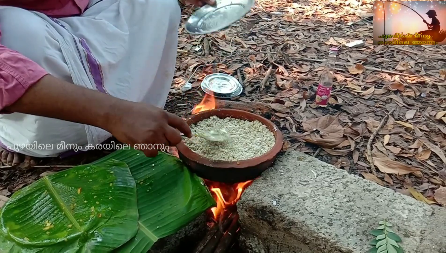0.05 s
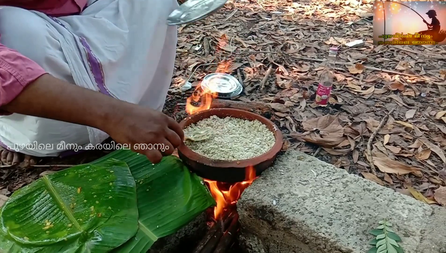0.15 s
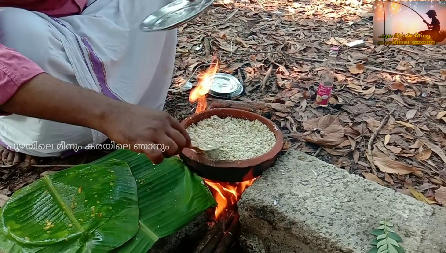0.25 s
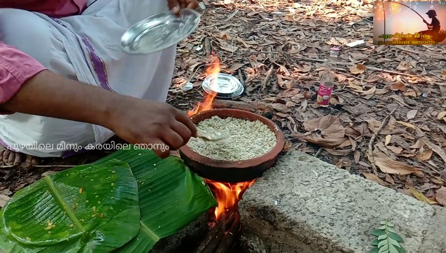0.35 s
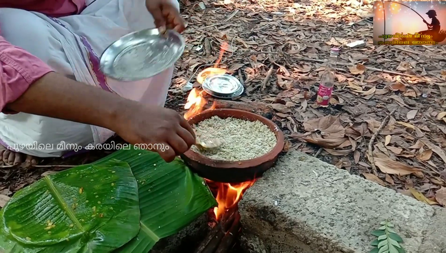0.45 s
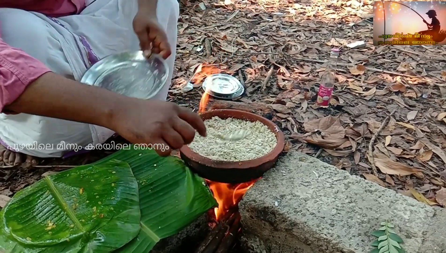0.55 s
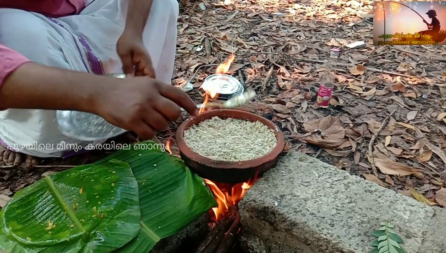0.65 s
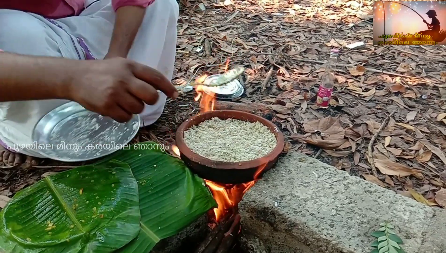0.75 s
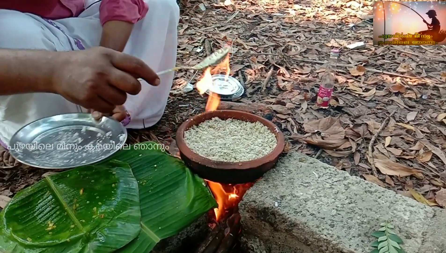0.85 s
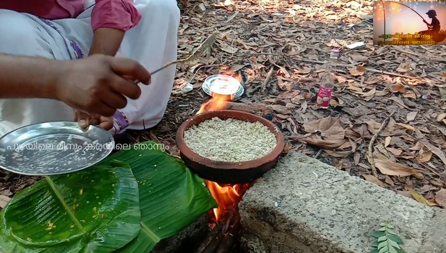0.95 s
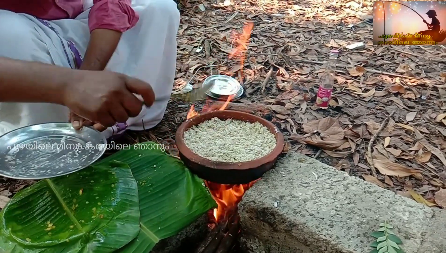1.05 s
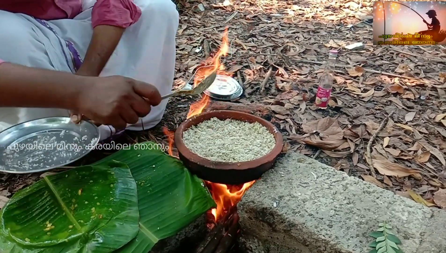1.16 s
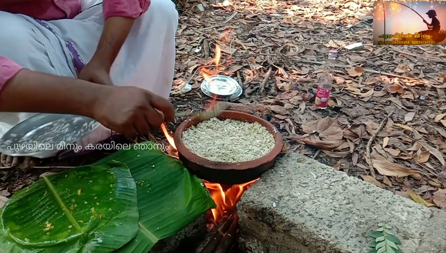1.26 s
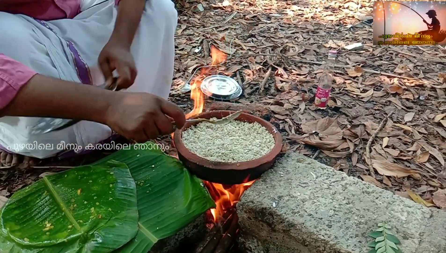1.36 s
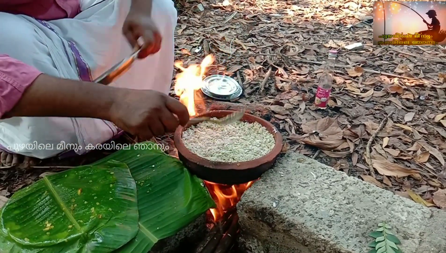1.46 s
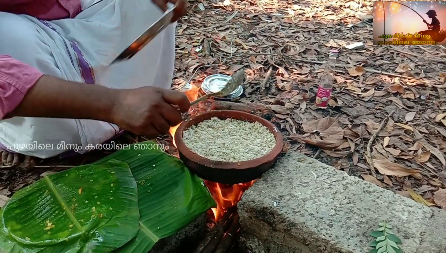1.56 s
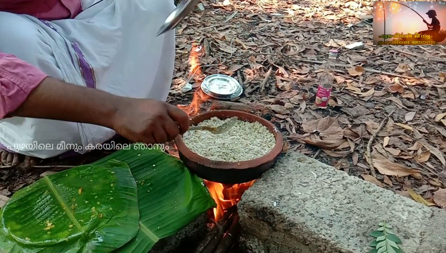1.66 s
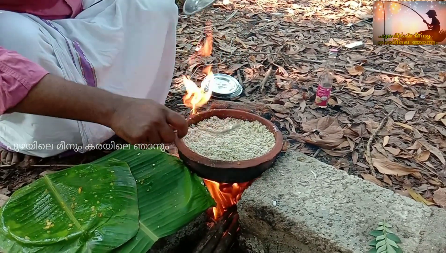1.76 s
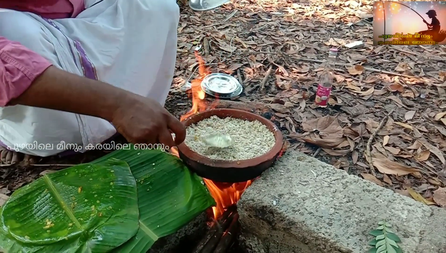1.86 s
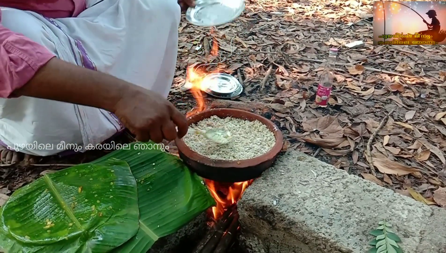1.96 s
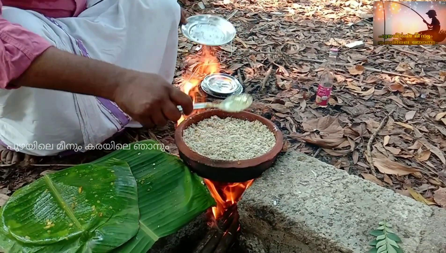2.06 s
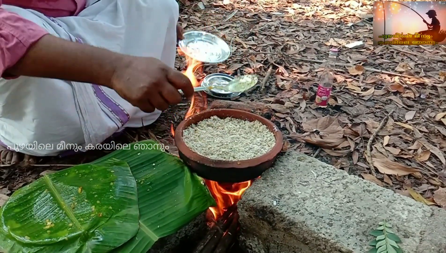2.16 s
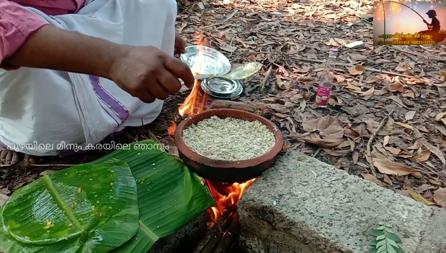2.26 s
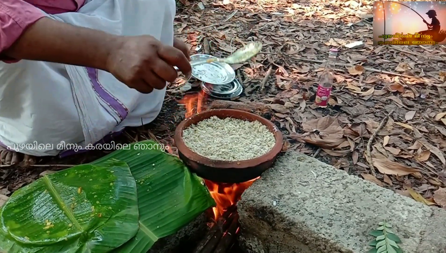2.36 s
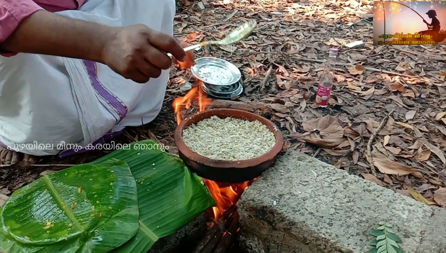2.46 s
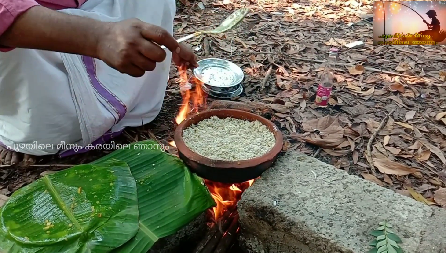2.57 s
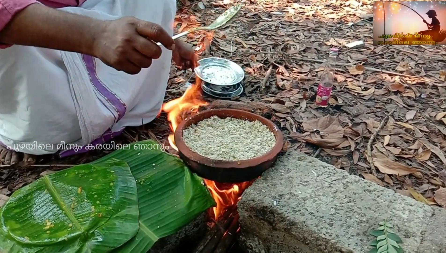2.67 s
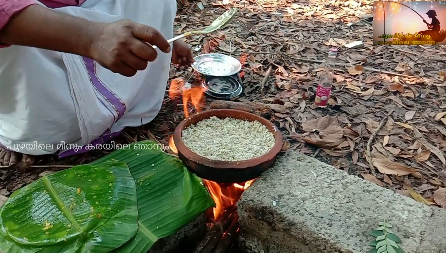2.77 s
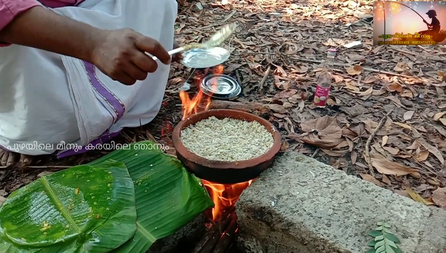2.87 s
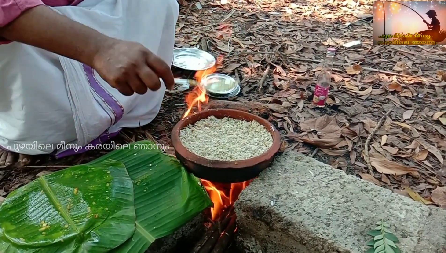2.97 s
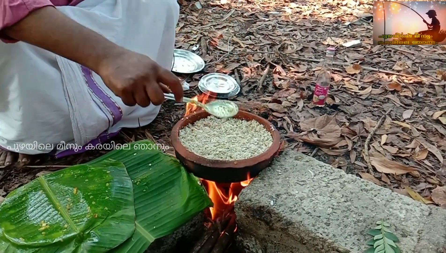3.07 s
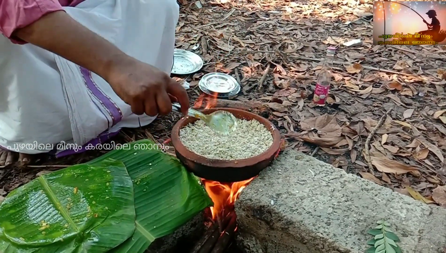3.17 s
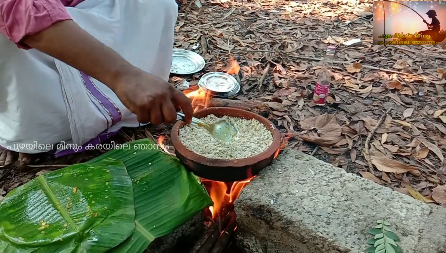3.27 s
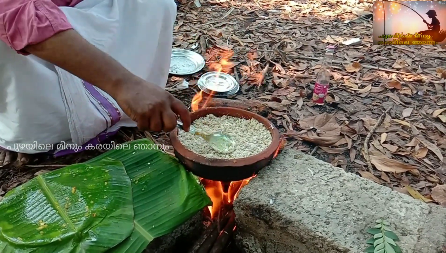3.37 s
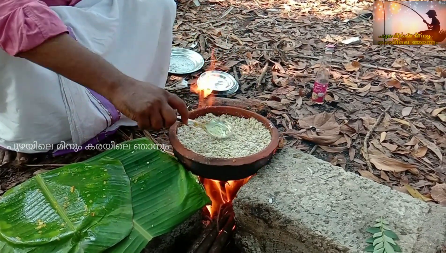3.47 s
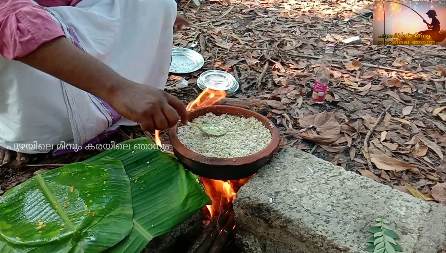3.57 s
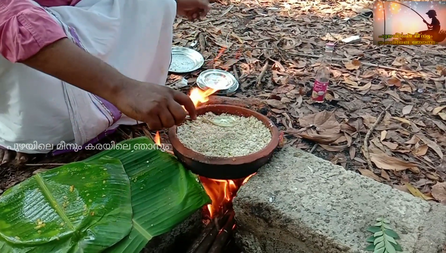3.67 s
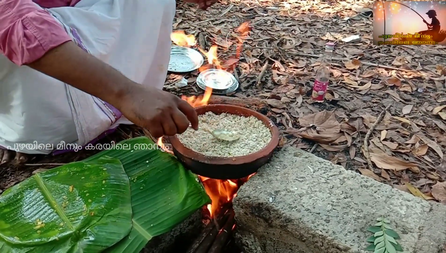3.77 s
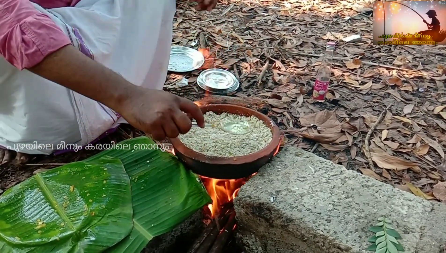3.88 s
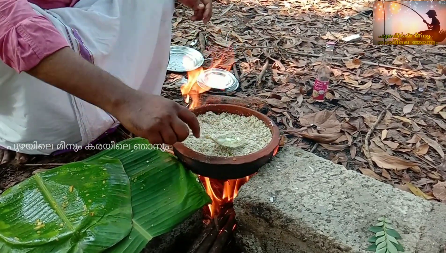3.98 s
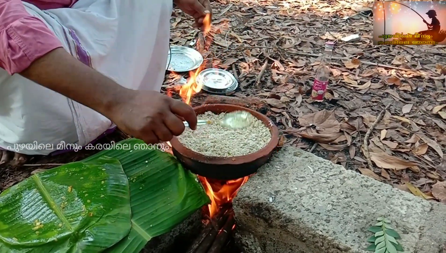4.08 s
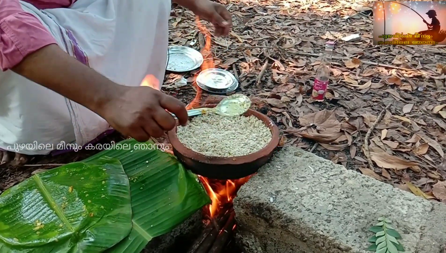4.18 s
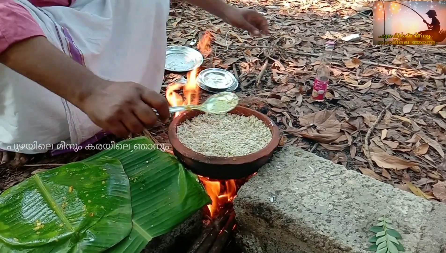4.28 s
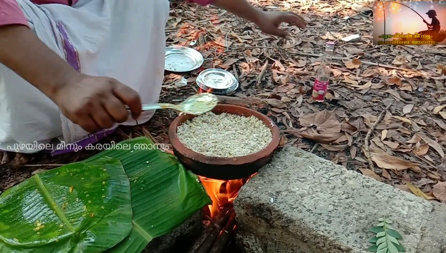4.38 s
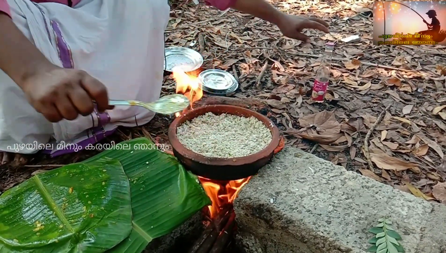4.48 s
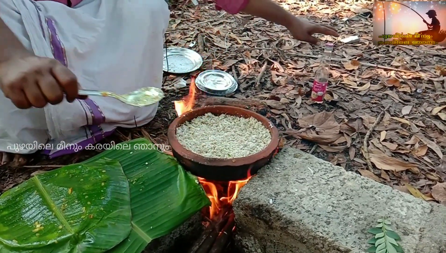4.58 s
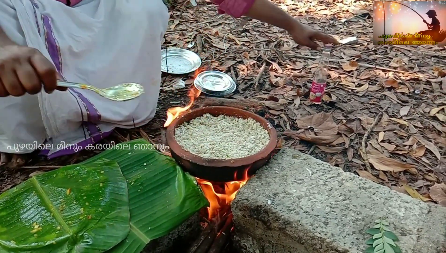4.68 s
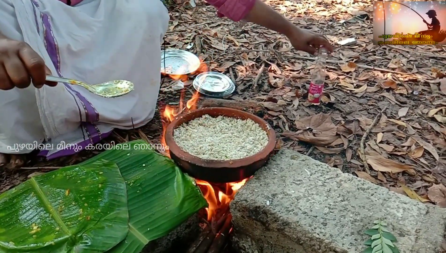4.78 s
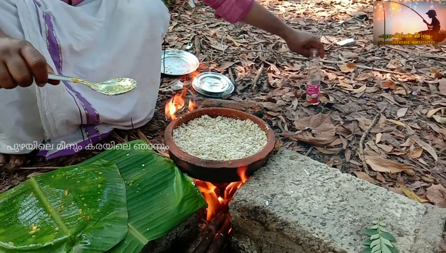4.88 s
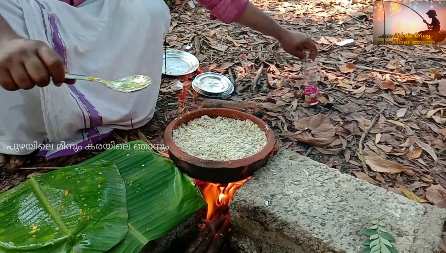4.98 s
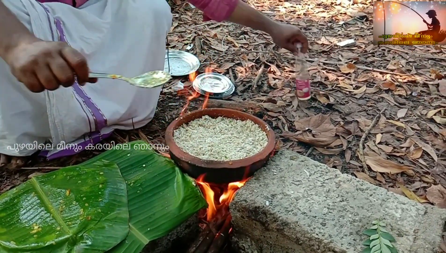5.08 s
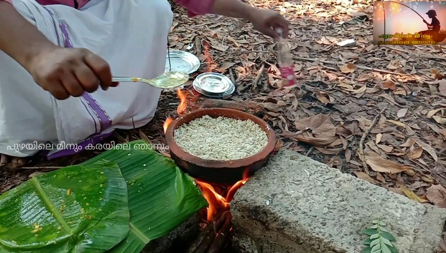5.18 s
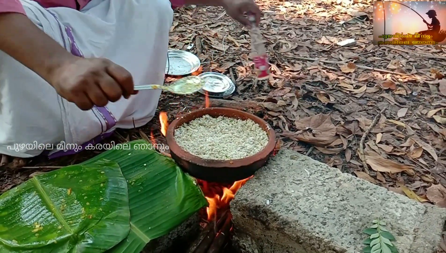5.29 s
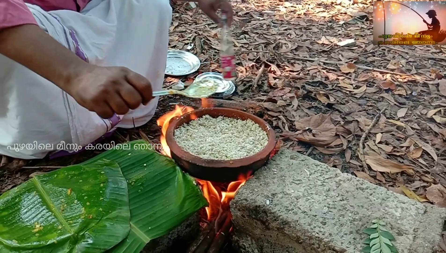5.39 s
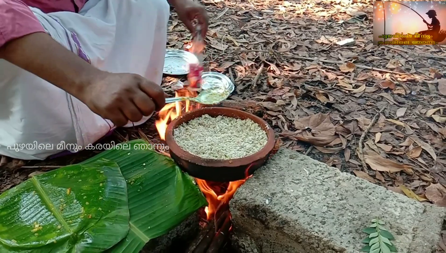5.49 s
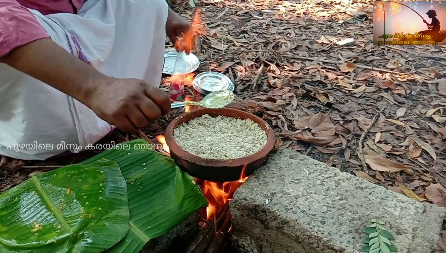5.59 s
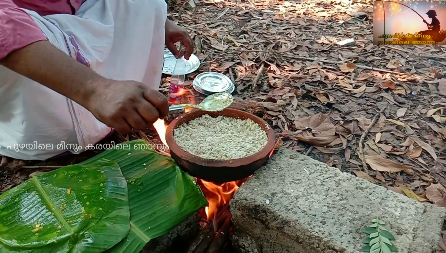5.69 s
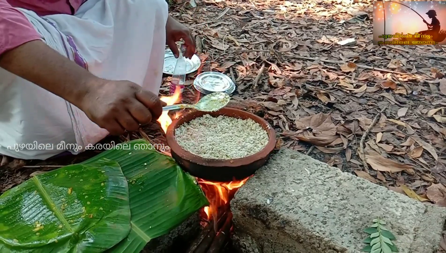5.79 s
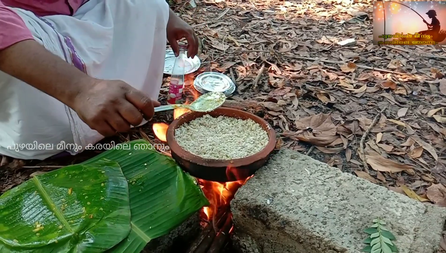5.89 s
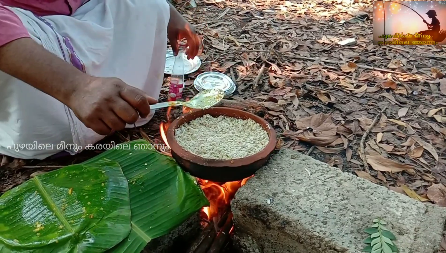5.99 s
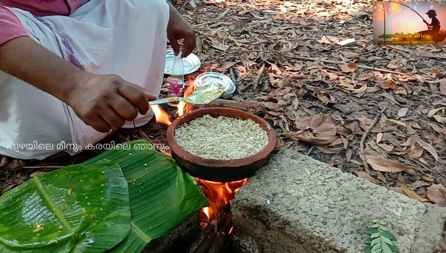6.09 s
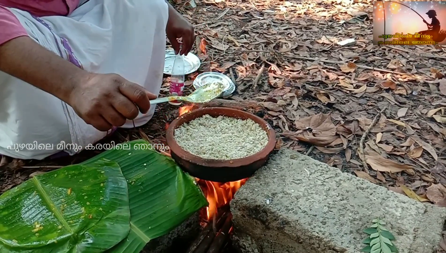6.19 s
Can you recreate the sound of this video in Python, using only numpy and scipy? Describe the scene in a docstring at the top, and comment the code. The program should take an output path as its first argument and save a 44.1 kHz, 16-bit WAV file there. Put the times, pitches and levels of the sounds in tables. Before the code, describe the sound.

Close to a phone microphone outdoors, a steel spoon quickly rattles on a clay pot rim. About two seconds later a thin metal lid clatters onto plates, bouncing and scraping briefly. A small wood fire flutters low, crackles and snaps throughout under a flickering hiss. Birds chirp, rasp and whistle sharply, with hoarse calls and a nasal mew echoing in the trees.

```python
"""A steel spoon rattles on the rim of a clay pot, then a small steel lid drops on other plates: outdoor cooking.
Each contact rings damped modes and adds a noise crack and thud; the lid scrapes, utensils knock, grains rustle.
The wood fire is fluttering low noise, snaps and fine crackle; behind it hisses filtered, flickering noise.
Birds whistle, chirp, click, mew and squeak as gliding tones, clicks and harmonic voices in echoing trees.
A phone stands close by; its microphone port rings near 1.3 and 5.5 kHz."""
import sys
import numpy as np
from scipy import signal
from scipy.fft import rfft, irfft
from scipy.io import wavfile
from scipy.ndimage import uniform_filter1d

SR = 44100
rng = np.random.default_rng(int(sys.argv[2]) if len(sys.argv) > 2 else 0)


def unload_audio(sound):
    """Save the sound as a 16-bit wav file, at the path given as the first command line argument."""
    columns = np.transpose(np.atleast_2d(sound))
    # keep every value between -1 and 1, then stretch to whole-number steps
    steps = np.round(np.clip(columns, -1, 1) * 32767)
    wavfile.write(sys.argv[1], SR, steps.astype(np.int16))


N = 275556
TIME = np.arange(N) / SR


def undb(db):
    """Amplitude factor of a level in dB."""
    return 10 ** (np.asarray(db) / 20)


def unit(x):
    """Scale to rms 1."""
    return x / np.sqrt(np.mean(x ** 2))


def peak(x, db, size=88):
    """Set the level of the loudest 2 ms."""
    loudest_power = uniform_filter1d(x ** 2, size).max()
    return x * undb(db) / np.sqrt(loudest_power)


def add(out, start_s, x):
    """Mix x in from start_s."""
    i = max(int(start_s * SR), 0)
    out[i:i + len(x)] += x[:N - i]


def walk(points_per_s, size=N):
    """Random wander with spread near 1, in straight lines between random points."""
    steps = np.arange(size) * points_per_s / SR
    count = int(steps[-1]) + 2
    return 1.213 * np.interp(steps, np.arange(count), rng.standard_normal(count))


def swells(rows):
    """Gain of smooth swells, each with its own rise and fall."""
    gain = np.zeros(N)
    for peak_s, rise_s, fall_s, db in rows:
        width_s = np.where(TIME < peak_s, rise_s, fall_s)
        gain += undb(db) * np.exp(-((TIME - peak_s) / width_s) ** 2)
    return gain


def track(rows):
    """Start time and sample-by-sample columns of a curve."""
    s, *columns = np.transpose(rows)
    t = np.arange(s[0], s[-1], 1 / SR)
    return s[0], *(np.interp(t, s, c) for c in columns)


def colour(x, points, size=4096):
    """Minimum-phase filter with the given (Hz, dB) response, via the folded cepstrum."""
    hz, db = np.transpose(points)
    log_bins = np.log(np.fft.rfftfreq(size, 1 / SR) + 1)
    gain = undb(np.interp(log_bins, np.log(hz), db))
    cepstrum = irfft(np.log(gain))
    cepstrum[1:size // 2] *= 2
    cepstrum[size // 2 + 1:] = 0
    impulse = irfft(np.exp(rfft(cepstrum)))
    return signal.fftconvolve(x, impulse)[:len(x)]


def resonance(x, hz, width_hz):
    """Two-pole band-pass."""
    return signal.lfilter(*signal.iirpeak(hz, hz / width_hz, fs=SR), x)


# Microphone port resonances. Each row: frequency in Hz, width in Hz, level in dB.
PORT = [(1275, 33.5, 17), (5305, 266, 6.5), (5580, 110, 8.5)]


def port(x):
    """Broadband sound rings the microphone port."""
    return x + sum(undb(db) * resonance(x, hz, width_hz) for hz, width_hz, db in PORT)


def decay(t, t60_s):
    """Exponential decay by 60 dB in t60_s."""
    return np.exp(-np.log(1000) * t / t60_s)


def burst(t60_s, size=8192):
    """Noise that dies away after a contact."""
    return rng.standard_normal(size) * decay(np.arange(size) / SR, t60_s)


def tone(hz):
    """Sine of rms 1 on a moving pitch."""
    return np.sqrt(2) * np.sin(2 * np.pi * np.cumsum(hz) / SR)


def crackle(per_s, spread_db):
    """Tiny random pops, a few of them larger; rms 1."""
    sizes = undb(spread_db * np.minimum(rng.exponential(size=N), 3))
    pops = (rng.random(N) < per_s / SR) * sizes * rng.choice([-1, 1], N)
    return unit(signal.fftconvolve(pops, burst(.003))[:N])


def trees(x, t60_s, buildup_s=0.0045):
    """Diffuse echo from trunks and leaves: decaying noise of unit energy."""
    tail = burst(t60_s, size=SR) * (1 - np.exp(-TIME[:SR] / buildup_s))
    return signal.fftconvolve(x, tail / np.sqrt(np.sum(tail ** 2)))[:N]


# Thin steel radiates little bass. Each row: frequency in Hz, gain in dB.
STEEL_BASS = [(100, -20), (500, -17.5), (800, -3), (1500, 0)]


def clatter(hits, clink, modes, thud, clink_t60_s, thud_t60_s, crack_db, ring_db,
            ring_tilt_db, ring_stretch, size=16384):
    """Each contact rings the steel, choked at once and then singing on faintly; it also cracks and thuds."""
    steel, body = np.zeros((2, N))
    t = TIME[:size]
    hz, db, t60_s = np.transpose(modes)[:, :, None]
    partials = undb(db) * decay(t, t60_s * ring_stretch) * np.sin(2 * np.pi * hz * t)
    # tilt in dB per octave away from the loudest mode: the free ring spreads wider than the clink
    octaves = abs(np.log2(hz[:, 0] / hz[np.argmax(db), 0]))
    tilt = undb(ring_tilt_db * octaves)
    choke = decay(t, clink_t60_s) * (1 - np.exp(-t / 0.0002))
    for s, clink_db, thud_db in hits:
        shares = undb(3 * rng.standard_normal(len(modes)))  # every contact meets the modes differently
        signs = rng.choice([-1, 1], len(modes))
        add(steel, s, peak(shares @ partials * choke, clink_db))
        add(steel, s, peak(signs * shares * tilt @ partials, clink_db + ring_db))
        add(steel, s, peak(colour(burst(clink_t60_s), clink), clink_db + crack_db))
        add(body, s, peak(colour(burst(thud_t60_s), thud), thud_db))
    return colour(steel, STEEL_BASS) + body


# Spoon on the pot rim. Each row: start in seconds, clink level in dB before the bass cut, pot thud in dB.
SPOON_HITS = [(.1715, -24.5, -41), (.1752, -19, -46.5), (.1843, -17.5, -40), (.1862, -14.5, -37),
              (.1901, -14.5, -48), (.2055, -34.5, -46), (.2085, -27.5, -39)]
# Crack spectrum. Each row: frequency in Hz, gain in dB.
SPOON_CLINK = [(880, -36), (1500, -47), (1720, -17), (2040, -46), (2400, -10.5), (3000, -13), (3500, -23),
               (4630, -29), (5350, -12), (5950, -15), (6490, -26), (7010, -23), (9180, -32.5), (10800, -26),
               (15000, -52)]
# Spoon modes. Each row: frequency in Hz, level in dB, t60 in seconds before ring_stretch.
SPOON_MODES = [(1680, -32, .12), (2295, -22, .17), (2455, -22, .12), (2803, -15, .17), (2910, -8, .12),
               (3028, -13, .1), (3086, -11, .12), (3388, -20, .15), (3830, -24, .3), (5210, -4, .09),
               (5412, 0, .06), (5818, -2, .1), (5940, -8, .11), (6970, -25, .11), (7505, -26, .14),
               (8120, -30, .09), (9955, -29, .2), (10470, -28, .15), (10775, -25, .18), (10850, -28, .15)]
# Pot thud spectrum. Each row: frequency in Hz, gain in dB.
POT_THUD = [(30, -29), (120, -46), (220, -6), (285, 3), (400, -8.5), (520, -13.5), (700, -18), (845, -3.5),
            (980, -34), (1250, -6), (2000, -30), (4000, -31)]


def spoon():
    """Steel spoon rattles on the rim; the clay pot thuds."""
    return clatter(SPOON_HITS, SPOON_CLINK, SPOON_MODES, POT_THUD, clink_t60_s=.024, thud_t60_s=0.085,
                   crack_db=-8, ring_db=-12, ring_tilt_db=3.5, ring_stretch=0.85)


# Lid landing on the plates; the last row, at 2.947, is probably the spoon touching a plate.
# Each row: start in seconds, clink level in dB before the bass cut, thud in dB.
PLATE_HITS = [(2.3227, -18, -44), (2.326, -25, -41), (2.3318, -23, -42), (2.338, -27, -37),
              (2.345, -29, -46), (2.376, -37, -49), (2.413, -46, -67), (2.4515, -36, -52),
              (2.464, -44, -38), (2.4935, -25.5, -40), (2.496, -28, -35), (2.503, -26.5, -34),
              (2.626, -47.5, -66), (2.947, -37.5, -55)]
# Crack and scrape-tick spectrum. Each row: frequency in Hz, gain in dB.
LID_CLINK = [(880, -69), (1500, -22), (1600, -36), (1890, -29), (2160, -26), (2400, -43), (2620, 2),
             (2890, -16), (3090, 4), (4370, -4.5), (5300, 7), (6740, -5), (8180, -15.5), (12100, -12.5),
             (15000, -42)]
# Lid modes. Each row: frequency in Hz, level in dB, t60 in seconds before ring_stretch.
LID_MODES = [(770, -7, 0.076), (1270, -15, 0.087), (1610, -26, 0.13), (2180, -26, 0.18), (2632, -32, 0.62),
             (3085, -27, 0.23), (3564, -32, 0.35), (4156, -18, 0.072), (4613, -17, 0.1), (4872, -20, 0.13),
             (5184, -6, 0.095), (5340, -17, 0.16), (5421, -8, 0.069), (5545, -31, 0.57), (5739, 0, 0.037),
             (5830, -11, 0.11), (5970, -11, 0.06), (6481, -11, 0.091), (6638, -18, 0.11), (7235, -29, 0.12),
             (7709, -32, 0.11), (8533, -38, 0.14), (9690, -33, 0.091), (10300, -37, 0.13),
             (11050, -42, 0.16), (11890, -46, 0.23)]
# Thud spectrum. Each row: frequency in Hz, gain in dB.
PLATE_THUD = [(30, -48), (120, -8), (240, -10), (330, -2), (480, -22), (660, -9), (780, 0), (980, -12),
              (1200, 1), (1550, -18), (2200, -11), (4000, -35)]


def plates():
    """Small steel lid lands on plates in several contacts; a last touch rings the same modes."""
    return clatter(PLATE_HITS, LID_CLINK, LID_MODES, PLATE_THUD, clink_t60_s=.036, thud_t60_s=.055,
                   crack_db=-7, ring_db=-6, ring_tilt_db=.5, ring_stretch=1.1)


# Steel scraping on steel. Each row: loudest at seconds, rise in s, fall in s, gain in dB.
SCRAPES = [(2.355, 0.029, 0.02, -40), (2.435, 0.019, 0.039, -47), (2.53, 0.027, .11, -54.5),
           (2.962, .008, 0.036, -52)]


def scrapes(ring_db=-2.0, tick_db=-7.0):
    """Steel slides on the plates in a stream of tiny contacts that tick and ring the lid's damped modes."""
    contacts = crackle(per_s=320, spread_db=4.5)
    ring = sum(undb(db / 2) * resonance(contacts, hz, 41) for hz, db, _ in LID_MODES)  # half the dB contrast
    tick = colour(contacts, LID_CLINK)
    return (undb(ring_db) * unit(ring) + undb(tick_db) * unit(tick)) * swells(SCRAPES)


# Handled utensils. Each row: start in seconds, level in dB, resonance in Hz, t60 of the noise in seconds.
KNOCKS = [(0.26, -52.5, 775, 0.017), (0.792, -56.5, 513, 0.11), (1.531, -54, 695, 0.02),
          (1.704, -51.5, 370, 0.017), (1.818, -47.5, 467, 0.0088), (2.65, -51, 610, 0.09),
          (2.947, -43.5, 950, 0.066), (2.949, -44.5, 477, 0.037), (3.192, -41.5, 850, 0.029),
          (3.196, -48.5, 357, 0.029), (3.341, -51.5, 484, 0.054), (3.589, -45.5, 507, 0.032),
          (3.732, -54.5, 710, 0.065)]


def knocks():
    """Dull, short knocks: noise bursts with one broad resonance each."""
    out = np.zeros(N)
    for s, db, hz, t60_s in KNOCKS:
        narrow = resonance(burst(t60_s), hz, 0.38 * hz)
        add(out, s, peak(port(resonance(narrow, hz, 4.3 * hz)), db))
    return out


# Grains under the spoon. Each row: loudest at seconds, rise in s, fall in s, level in dB.
RUSTLES = [(3.3, 0.065, .06, -62), (4.0, .14, .14, -65)]
# Rustle spectrum. Each row: frequency in Hz, gain in dB.
RUSTLE_COLOUR = [(500, -4), (1500, -3), (3200, 0.5), (4200, -13), (5500, -19), (7000, -10), (8200, -27),
                 (10000, -12), (12500, -18), (15000, -30)]


def rustles():
    """The spoon spreads the dry grains: dense tiny pops."""
    grains = crackle(per_s=1500, spread_db=1.0)
    return unit(colour(grains, RUSTLE_COLOUR)) * swells(RUSTLES)


# Flame spectrum. Each row: frequency in Hz, gain in dB.
FLAME_COLOUR = [(20, -22), (40, -36), (60, -11.5), (85, 2.5), (110, 0.5), (150, -2), (210, -10.5),
                (300, -16.5), (450, -24), (1000, -46.5)]
# Flare-ups. Each row: loudest at seconds, rise in s, fall in s, level added in dB before flutter.
FLARES = [(.23, 0.035, 0.06, -57), (1.39, 0.058, 0.2, -57), (2.15, 0.025, 0.017, -60.5),
          (2.42, 0.073, 0.086, -57.5), (3.0, 0.33, 0.35, -64), (4.5, 0.16, 0.9, -69.5)]
# Fine crackle spectrum: (Hz, dB)
CRACKLE_COLOUR = [(500, -2.5), (3200, -5.0), (4300, -16.0), (5000, 2.5), (6800, 2.5), (8200, -20.0),
                  (10000, -12.5), (15000, -17)]
FLAME_DB, FLUTTER_DB, FLUTTER_POINTS_PER_S = -61.5, 3, 29


def fire(crackle_db=-67):
    """Fluttering flames of low noise and a fine random crackle."""
    flames = unit(colour(rng.standard_normal(N), FLAME_COLOUR))
    flames *= (undb(FLAME_DB) + swells(FLARES)) * undb(FLUTTER_DB * walk(FLUTTER_POINTS_PER_S))
    fine = colour(crackle(per_s=260, spread_db=3.5), CRACKLE_COLOUR)
    return flames + undb(crackle_db) * unit(port(fine))


# Snaps: wood in the fire, and a few sharp clicks within the birds' rasps (1.3242, 1.3396, 1.351, 5.121).
# Each row: start in seconds, level in dB, t60 of the noise in seconds, treble gain in dB.
SNAPS = [(.142, -48, .0046, -5.5), (.5125, -45, .0055, 5), (.535, -44, 0.0063, -4),
         (0.763, -45, 0.0089, 11.5), (0.7777, -48, .0077, -2), (1.037, -43, .04, 14),
         (1.3242, -37, .0092, 8), (1.3396, -37, .0036, -9), (1.351, -38.5, .006, 6), (1.507, -52, .0056, 2),
         (1.911, -52, .004, -10), (2.8874, -24, 0.0019, -3), (3.105, -39.5, .02, 15.5),
         (3.325, -42.5, 0.0085, -10), (3.347, -45.5, 0.023, 10), (3.7367, -50, 0.0078, 8),
         (4.187, -55, .0054, 11), (4.317, -52, 0.012, 5), (5.047, -48, 0.013, 11), (5.121, -33, 0.0077, -3),
         (5.475, -42.5, 0.0084, 19), (5.526, -49, .0036, -4), (5.752, -48, 0.037, -4),
         (5.913, -48.5, 0.0083, -16), (5.946, -54, 0.0044, -5)]
# Snap spectrum before the treble gain. Each row: frequency in Hz, gain in dB.
SNAP_COLOUR = [(300, -22), (1200, -20), (3000, -7.5), (5000, 11.5), (6700, 11.5), (8200, -8.5),
               (10500, 0.5), (13000, -14), (15500, -11)]


def snaps():
    """Wood snaps and the clicks within the birds' rasps: short coloured noise bursts."""
    out = np.zeros(N)
    for s, db, t60_s, treble_db in SNAPS:
        snap = colour(burst(t60_s), SNAP_COLOUR)
        snap = colour(snap, [(5500, 0), (10000, treble_db)])
        add(out, s, peak(port(snap), db))
    return out


# Songs. Each row: whistle's hook in seconds, whistle level in dB, echo in dB before echo_gain, rasp in dB.
SONGS = [(1.411, -33, -40.5, -35.5), (2.529, -32.5, -39.5, -44), (5.206, -27, -40.5, -36)]
# Whistle curve. Each row: seconds from the hook, pitch in Hz, level in dB.
WHISTLE_SHAPE = [(-.032, 2474, -28), (-.022, 2660, -29), (-.013, 2933, -10.5), (-.006, 3077, -14),
                 (0, 3420, -4), (.005, 3494, 0.5), (.010, 3330, -15.5), (.018, 2630, -27)]


def whistler(echo_t60_s=0.38, echo_gain=1.8):
    """A whistle slides up and hooks over; the echo holds it with about half the level contrast in dB."""
    direct, far = np.zeros((2, N))
    start, hz, db = track(WHISTLE_SHAPE)
    for s, direct_db, echo_db, _ in SONGS:
        note = tone(hz * (1 + .015 * walk(400, len(hz))))
        add(direct, s + start, note * undb(db + direct_db))
        add(far, s + start, note * undb(0.47 * db + echo_db))
    return direct + echo_gain * trees(far, echo_t60_s)


# Thin chirps. Each row: start in seconds, length in seconds, start pitch in Hz, end pitch in Hz, level in dB.
CHIRPS = [(0.301, 0.028, 4950, 6070, -50), (0.397, 0.0278, 4770, 6380, -42),
          (0.41, 0.014, 3170, 3560, -49.5), (0.54, 0.0286, 4950, 6420, -40), (1.11, 0.11, 4960, 5000, -62),
          (1.711, .04, 5400, 5650, -60.5), (4.549, 0.063, 4770, 5040, -59), (4.644, 0.048, 5390, 5730, -45),
          (4.705, .16, 5500, 5350, -59.5), (5.756, 0.021, 3450, 3650, -58)]
# Rasp curve before the whistle. Each row: seconds from the hook, pitch in Hz, level in dB.
RASP_SHAPE = [(-.185, 4400, -41), (-.155, 4590, -10.5), (-.115, 4614, -8), (-.086, 5260, -6.5),
              (-.06, 4300, -11.5), (-.035, 3590, -15)]


def small_birds(chirp_echo_db=0.0, rasp_echo_db=-6.0):
    """Buzzy gliding chirps, and the rasp that opens each song: its pitch shakes very fast."""
    chirps, rasps = np.zeros((2, N))
    for s, length_s, start_hz, end_hz, db in CHIRPS:
        hz = np.linspace(start_hz, end_hz, int(length_s * SR))
        hz *= 1 + .06 * walk(1200, len(hz))
        add(chirps, s, tone(hz) * np.hanning(len(hz)) * undb(db))
    start, hz, db = track(RASP_SHAPE)
    for s, _, _, rasp_db in SONGS:
        shake = 0.21 * np.sin(2 * np.pi * 650 * TIME[:len(hz)]) + 0.0418 * walk(900, len(hz))
        rasp = unit(port(tone(hz * (1 + shake))))
        add(rasps, s + start, rasp * undb(rasp_db + db + 2.6 * walk(254, len(hz))))
    echo = trees(undb(chirp_echo_db) * chirps + undb(rasp_echo_db) * rasps, 0.44)
    return chirps + rasps + echo


CALL_ATTACK_S, CALL_RELEASE_S, CALL_FADE_DB = 0.05, 0.098, 12
CALL_ARCH = 0.02207  # pitch share between mid call and its ends


def arch(start_s, length_s, hz, glide_hz, db, throat_hz, rough):
    """Controls of a plain call: attack, hold and release under a slightly arched, gliding pitch."""
    t = np.arange(0, length_s, 1 / SR)
    along = 2 * t / length_s - 1  # -1 to 1
    fade = np.maximum(1 - np.minimum(t / CALL_ATTACK_S, (length_s - t) / CALL_RELEASE_S), 0)
    pitch_hz = hz * (1 + CALL_ARCH * (.5 - along ** 2)) + glide_hz * along / 2
    return start_s, pitch_hz, db - CALL_FADE_DB * fade ** 2, throat_hz, rough


def call(controls, throat_width_hz, jitter, bright_db, count=7):
    """Harmonic voice through a throat resonance, weak upper partials; roughness shakes pitch and level."""
    out = np.zeros(N)
    s, hz, db, throat_hz, rough = controls
    hz = hz * (1 + jitter * rough * walk(350, len(hz)))
    multiples = np.arange(1, count + 1)[:, None] * hz
    weights = 1 / (1 + ((multiples - throat_hz) / (throat_width_hz / 2)) ** 2)
    weights = weights + undb(bright_db) * (multiples > throat_hz)
    voice = sum(w * tone(f) for w, f in zip(weights, multiples)) / np.linalg.norm(weights, axis=0)
    rasp = 1 + 0.41 * rough * walk(700, len(hz))
    add(out, s, voice * rasp * undb(db + 3.1 * walk(60.6, len(hz))))
    return out


# Long nasal mew. Each row: time in seconds, pitch in Hz, level in dB before near gains,
# throat resonance in Hz, roughness 0-1.
MEW = [(2.98, 1100, -57, 3100, .7), (3.1, 1172, -54, 3430, .25), (3.17, 1135, -51.5, 3250, .12),
       (3.23, 1055, -52, 3150, .17), (3.31, 1008, -48.5, 2800, .2), (3.43, 955, -58, 2420, .22),
       (3.5, 1085, -54, 2750, .7), (3.58, 1152, -56, 2750, .5), (3.66, 1160, -73, 2900, .8)]
# A separate short, high squeak sounds over the end of the mew. One row: start in seconds, length in seconds,
# pitch in Hz, glide in Hz, level in dB before near gains, throat resonance in Hz, roughness 0-1.
SQUEAK = (3.548, .1, 2475, 100, -52.5, 3400, .1)
# Hoarse calls further off. Each row: start in seconds, length in seconds, pitch in Hz, glide in Hz,
# level in dB before far gains, throat resonance in Hz, roughness 0-1.
FAR_CALLS = [(0.488, 0.32, 668, -88.5, -59, 1360, 0.4), (0.998, .18, 590, -25, -54, 1520, 0.53),
             (1.216, 0.42, 647, -14.5, -54, 1350, 0.92), (2.262, 0.47, 434, 14, -45.5, 1400, 0.78),
             (2.72, .62, 413.9, -30, -47, 1430, 0.78), (3.912, 0.3, 1022, -10.5, -51.5, 1760, 0.73),
             (4.348, .54, 386, -12, -53, 1420, .85), (4.52, 0.33, 1072, 10, -42, 2180, .36),
             (4.966, .32, 400.4, 8.5, -56, 1790, 0.89)]


def large_birds(near_db=2.0, near_echo_db=-3.5, far_db=-26.5, far_echo_db=-5.5):
    """Harmonic voices: mew and separate squeak are fairly near; the hoarse calls arrive mostly as echo."""
    mew = call(track(MEW), throat_width_hz=650, jitter=.08, bright_db=-33, count=5)
    squeak = call(arch(*SQUEAK), throat_width_hz=1200, jitter=.08, bright_db=-31, count=3)
    near = mew + squeak
    far = sum(call(arch(*row), throat_width_hz=520, jitter=.06, bright_db=-42) for row in FAR_CALLS)
    echo = trees(undb(near_echo_db) * near + undb(far_echo_db) * far, 0.17)
    return undb(near_db) * near + undb(far_db) * far + echo


# Hiss spectrum before the port. Each row: frequency in Hz, gain in dB.
HISS_COLOUR = [(60, 3), (300, -2), (700, 6), (1300, 3.5), (2000, 2.5), (3200, 9), (4200, -4.5), (5500, 2.5),
               (6800, -11), (8000, -20), (9800, -8), (13000, -24.5), (15500, -17)]
# Hiss swells. Each row: loudest at seconds, rise in s, fall in s, gain added in dB.
HISS_SWELLS = [(2.48, .09, 0.081, -53), (3.1, 0.25, 0.19, -56), (4.72, 0.11, 0.15, -61.5)]
HISS_DB = -62.5


def hiss(count=14):
    """Hiss of the fire and the open air: noise in overlapping bands that flicker independently."""
    spectrum = rfft(unit(port(colour(rng.standard_normal(N), HISS_COLOUR))))
    log_bins = np.log(np.fft.rfftfreq(N, 1 / SR) + 1)
    place = np.interp(log_bins, np.log([700, 8000]), [0, count - 1])  # band number of each bin
    out = np.zeros(N)
    for k in range(count):
        band = irfft(spectrum * np.maximum(1 - abs(place - k), 0), N)
        out += band * undb(2.2 * walk(24))
    return out * (undb(HISS_DB) + swells(HISS_SWELLS))


# Spectrum of the noise that differs between channels. Each row: frequency in Hz, gain in dB.
SIDE_COLOUR = [(30, -5), (100, -2.5), (400, -3.5), (900, -6), (1280, 3.5), (1700, -8), (3000, -10),
               (7000, -26), (10000, -23.5), (15000, -10)]


def stereo(mid, side_db=-75):
    """Nearly mono: only a faint noise differs between the channels."""
    side = undb(side_db) * unit(colour(rng.standard_normal(N), SIDE_COLOUR))
    return np.array([mid + side, mid - side])


def scene():
    """Utensils with a faint echo, then grains, fire, snaps, birds and hiss."""
    hits = spoon() + plates() + scrapes() + knocks()
    echo = undb(-27.0) * trees(hits, 0.71)
    birds = whistler() + small_birds() + large_birds()
    return stereo(hits + echo + rustles() + fire() + snaps() + birds + hiss())


TOP_HZ = 15800


def record(dry):
    """The phone cuts the top: steep elliptic low-pass."""
    return signal.sosfilt(signal.ellip(8, .2, 70, TOP_HZ, fs=SR, output="sos"), dry)


dry = scene()
out = record(dry)
unload_audio(out)
```